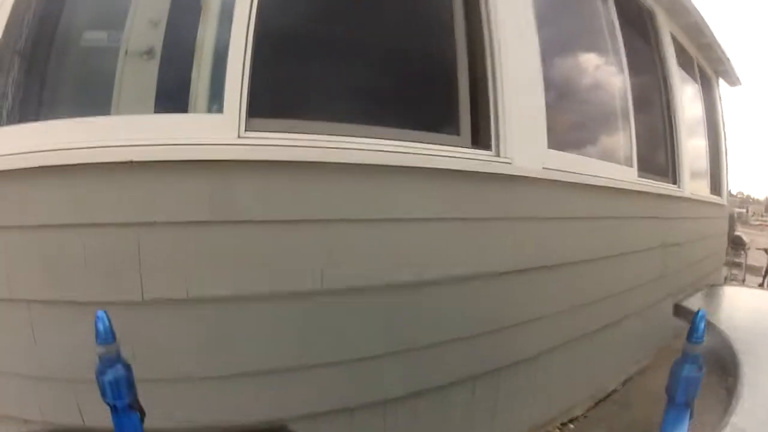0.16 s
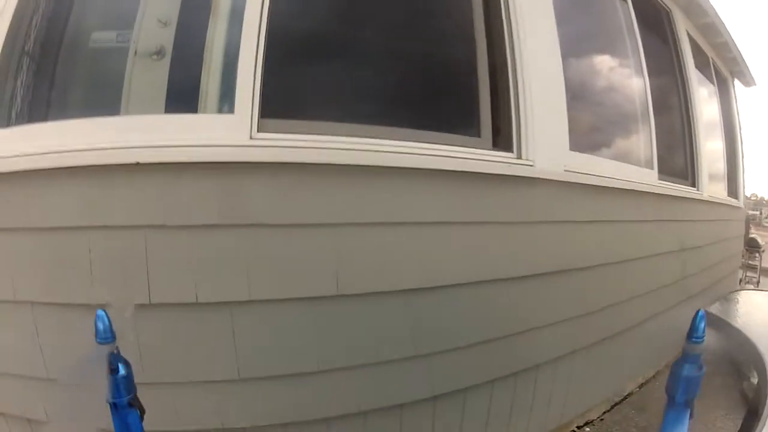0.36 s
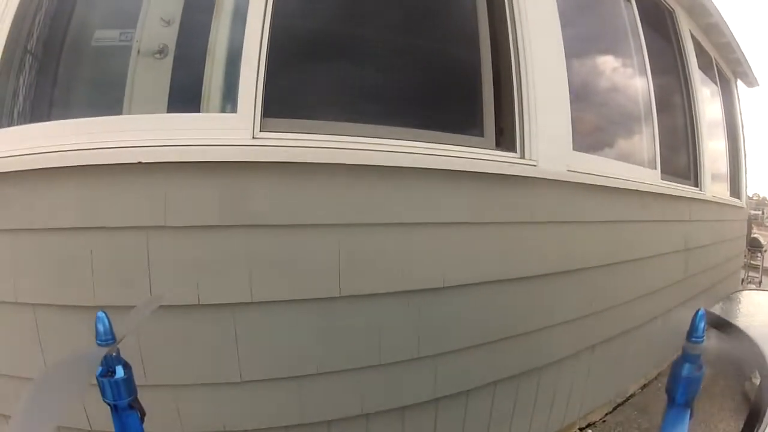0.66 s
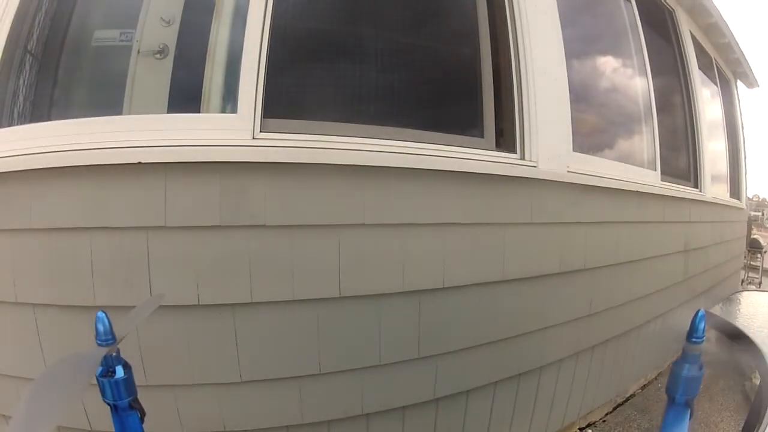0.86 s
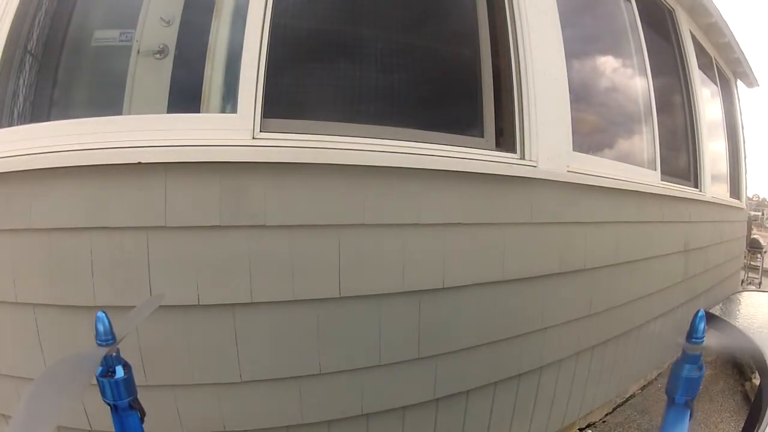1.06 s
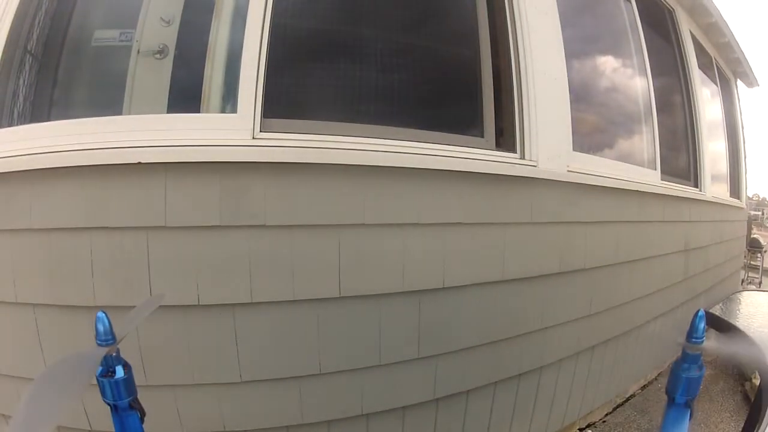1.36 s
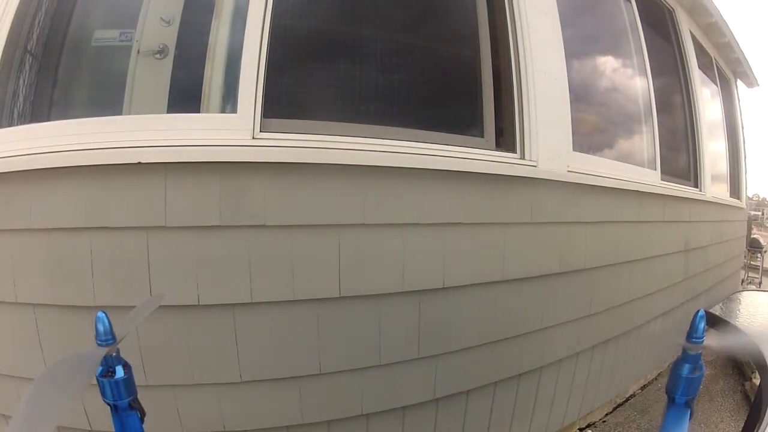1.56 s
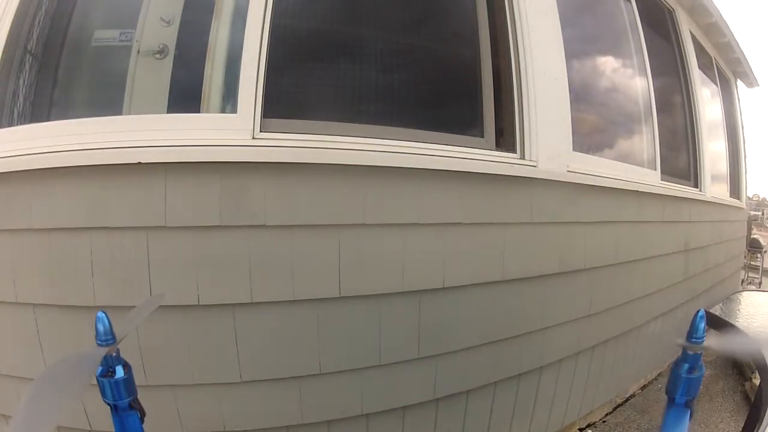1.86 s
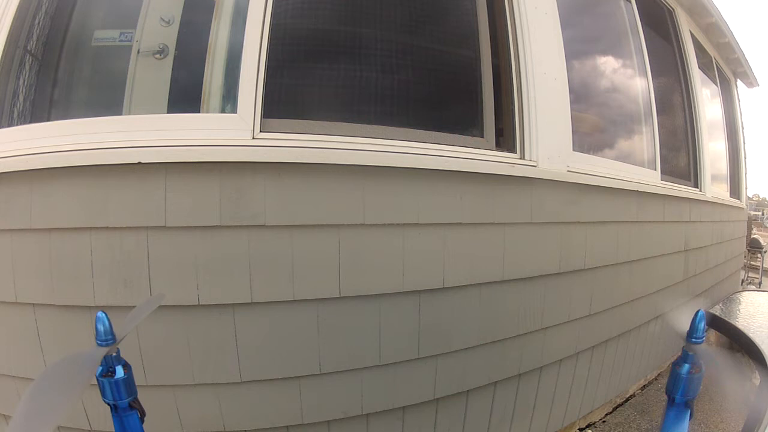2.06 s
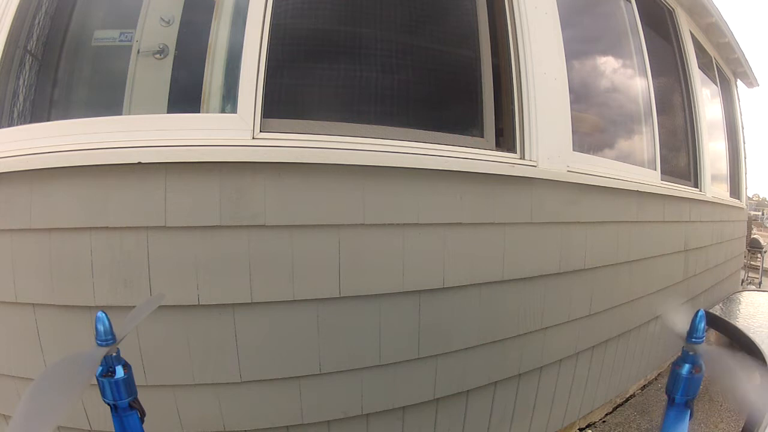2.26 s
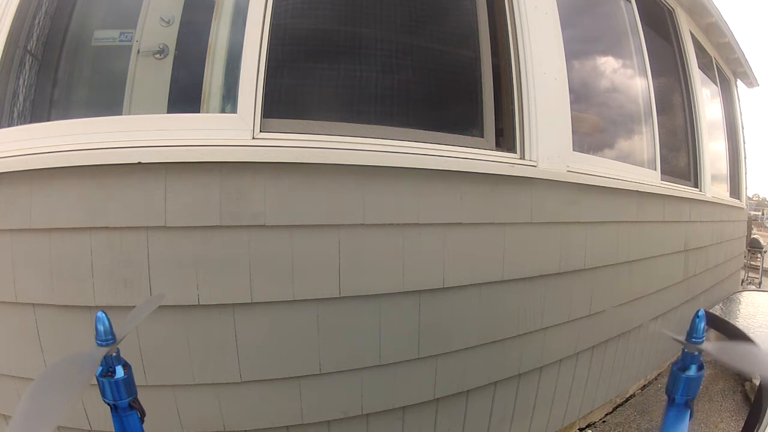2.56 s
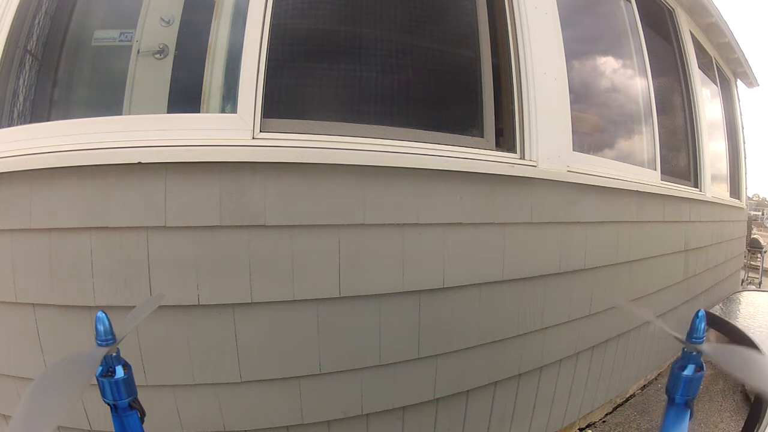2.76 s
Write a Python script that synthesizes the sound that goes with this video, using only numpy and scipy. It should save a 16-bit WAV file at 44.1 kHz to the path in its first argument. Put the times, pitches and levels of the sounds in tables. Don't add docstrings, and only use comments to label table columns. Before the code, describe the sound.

Slowed-down drone crash, captured by a microphone on the frame: a loud cluster of knocks and a thud, rapid uneven blade ticks, low rocking, sliding motor whine, fading to sparse faint clicks and near silence.

```python
import sys
import numpy as np
from scipy import signal
from scipy.fft import rfft, irfft, next_fast_len
from scipy.io import wavfile
from scipy.ndimage import map_coordinates

SR = 44100
rng = np.random.default_rng(int(sys.argv[2]) if len(sys.argv) > 2 else 0)


def gain_from_db(level_db):
    decades = np.asarray(level_db, float) / 20
    return 10 ** decades


def unload_wav(signal):
    wavfile.write(
        sys.argv[1],
        SR,
        np.round(np.clip(np.atleast_2d(signal).T, -1, 1) * 32767).astype(np.int16),
    )


N = 127890


def unit(x):
    return x / np.sqrt(np.mean(x ** 2) + 1e-20)


def along(points, hz):
    f, db = np.transpose(points)
    return gain_from_db(np.interp(np.log(hz + 1), np.log(f + 1), db))


def curves(rows):
    s, *columns = np.transpose(rows)
    return [np.interp(np.arange(N) / SR, s, column) for column in columns]


def wobble(rate):
    knots = rng.standard_normal(int(N * rate / SR) + 4)
    return map_coordinates(knots, [np.arange(N) * rate / SR])


def filtered(x, response):
    m = next_fast_len(N + SR // 2)
    return irfft(rfft(x, m) * response(np.fft.rfftfreq(m, 1 / SR)), m)[..., :N]


def body(peaks):
    def response(f):
        total = 0
        for k, (centre, width, db) in enumerate(peaks):
            damping = 1j * f * width
            total = total + (-1) ** k * gain_from_db(db) * damping / (centre ** 2 - f ** 2 + damping + 1e-9)
        return total
    return response


def case(f):
    case_hz = 2820
    return 1 / (1 + 1j * f / case_hz - (f / case_hz) ** 2) ** 2


def turns():
    cog_hz = [608, 530]
    jolts = [.07, .05]
    coast, ease, jolt_s = 1.0, 0.04, 0.6
    t = np.arange(N) / SR
    slowing = np.exp(-coast * t + ease * t * t)
    return [np.cumsum(hz * slowing * (1 + jolt * np.exp(-t / jolt_s))) / SR for hz, jolt in zip(cog_hz, jolts)]


def ticks():
    # (time [s], peak level [dB], ring [Hz])
    crash_blows = [
        (.001, -7.5, 2400),
        (.0085, -5, 3700),
        (.012, -13, 1700),
        (.0185, -10, 2100),
        (.022, -4.5, 1875),
        (.028, -2.5, 1880),
        (.048, -18.5, 1900),
    ]
    # (time [s], peak level [dB], ring [Hz])
    fast_ticks = [(0.0654, -26, 1740), (0.0722, -23.5, 1800), (0.0774, -13, 1250), (0.1042, -27, 2280),
                  (0.1396, -21.5, 1780), (0.173, -12, 1790), (0.1959, -17, 1850), (0.2074, -21.5, 1940),
                  (0.2294, -30, 1820), (0.2723, -13.5, 1830), (0.2944, -21, 1673), (0.3187, -15.5, 1170),
                  (0.3331, -13.5, 1830), (0.3611, -10.5, 1260), (0.382, -14.5, 1800), (0.4299, -22, 1900),
                  (0.4484, -20, 1794), (0.4893, -16.5, 1780), (0.5124, -25, 2240), (0.5297, -20.5, 1190),
                  (0.5482, -20.5, 1146), (0.5766, -20.5, 1193), (0.598, -15.5, 1660), (0.629, -21, 1220),
                  (0.6489, -31, 1740), (0.6744, -28, 1770), (0.6964, -35, 1810), (0.7357, -27, 1754),
                  (0.7544, -37, 1740), (0.7901, -30.5, 1800), (0.8066, -31, 1636), (0.8225, -26, 1773),
                  (0.8619, -29, 1722), (0.8964, -34.5, 1585), (0.9148, -27, 1220), (0.9264, -31, 2400),
                  (0.9482, -45, 1210), (0.9667, -34, 1253), (0.9802, -29, 1820), (1.0186, -41, 1750),
                  (1.0444, -38, 1336), (1.1014, -42.5, 2270)]
    # (time [s], peak level [dB], ring [Hz])
    slow_ticks = [(1.1258, -28, 2366), (1.1628, -32.5, 1170), (1.1957, -32, 2350), (1.2331, -39, 1348),
                  (1.3763, -39.5, 2140), (1.5015, -40, 2260), (1.5908, -33.5, 1485), (1.6886, -32.5, 1750),
                  (1.8008, -38.5, 1717), (1.8652, -55, 2300), (1.931, -38, 1780), (1.992, -39, 2200),
                  (2.005, -51, 2330), (2.0702, -37, 1770), (2.2463, -45.5, 1790), (2.3506, -55.5, 2440),
                  (2.5701, -56, 1241)]
    # (frequency [Hz], width [Hz], level [dB])
    blade_modes = [(1016, 340, -7), (1500, 94, -7.5), (1790, 130, -3.5), (2440, 370, -7.5),
                   (2810, 200, -14.5), (3700, 280, -9)]
    scrape_s, grows_per_s = 0.0039, 0.42
    ring_width_hz, ring_db = 360, 2.5
    case_leak, level_db = 0.13, -0.5

    rows = list(crash_blows) + list(fast_ticks) + list(slow_ticks)
    t = np.arange(SR // 10) / SR
    f = np.fft.rfftfreq(len(t), 1 / SR)
    blade = body(blade_modes)(f) * (case(f) + case_leak)
    out = np.zeros(N + SR)
    for s, db, hz in rows:
        length = scrape_s * np.exp(grows_per_s * s)
        shape = ((t / length) * np.exp(1 - t / length)) ** 4
        contact = shape * rng.standard_normal(len(t))
        own_mode = body([(hz, ring_width_hz, ring_db / 2)])(f) ** 2 * case(f / 2)
        ring = irfft(rfft(contact) * (blade + own_mode), len(t))
        start = max(round((s - 0.9 * length) * SR), 0)
        out[start:][:len(t)] += gain_from_db(db + level_db) * ring / np.abs(ring).max()
    return out[:N]


def rocking():
    # (time [s], level [dB])
    low_rocking = [(0.0, -17), (0.05, -36.5), (0.07, -20.5), (0.2, -25), (0.23, -33), (0.27, -19.5),
                   (0.3, -24.5), (0.4, -15.5), (0.48, -22.5), (0.51, -40), (0.54, -32.5), (0.86, -34.5),
                   (0.92, -44.5), (1.04, -34.5), (1.16, -66.5), (1.19, -47.5), (1.31, -45.5), (2.05, -57)]
    # (time [s], pitch [Hz], level [dB])
    upper_rocking = [(0, 129.7, -21.5), (.04, 99.1, -25), (.075, 98.7, -15), (.13, 100.3, -27),
                     (.16, 94.6, -17.5), (.19, 97, -25.5), (.23, 107.1, -16), (.27, 106.2, -23),
                     (.31, 105.7, -15.5), (.35, 100.9, -20.5), (.42, 111.4, -16), (.48, 104.9, -23.5),
                     (.59, 107.3, -28.5), (.72, 113, -39), (.93, 114.2, -37), (1.06, 104.1, -45.5),
                     (1.1, 104.9, -61), (1.42, 119, -53.5)]
    # (middle [s], half length [s], pitch [Hz], level [dB])
    late_swells = [(1.53, 0.042, 118, -43), (1.599, 0.03, 122, -39.5), (1.725, 0.027, 122, -38),
                   (1.81, 0.064, 108, -40.5), (1.892, 0.035, 112, -39), (1.949, 0.053, 127, -39),
                   (2.061, 0.073, 113.2, -44), (2.133, 0.057, 75, -43.5), (2.177, 0.039, 115.3, -51),
                   (2.271, 0.047, 71.4, -37), (2.364, 0.07, 70.35, -45.5), (2.365, .05, 125, -47.5),
                   (2.48, .03, 105, -46.5), (2.57, 0.041, 122, -38.5), (2.698, .06, 105.8, -46.5),
                   (2.85, .04, 72, -41.5)]
    low_hz, rest_db_per_s = 74.8, 4.5
    thud_db, thud_hz, thud_t60_s = -6.5, 162, 0.14

    t = np.arange(N) / SR
    low_db, = curves(low_rocking)
    up_hz, up_db = curves(upper_rocking)
    low_cycles = np.cumsum(low_hz + 4.0 * wobble(8.2)) / SR
    low = gain_from_db(low_db + 2.0 * wobble(12)) * np.sin(2 * np.pi * low_cycles)
    up_cycles = np.cumsum(up_hz + 6 * wobble(30)) / SR
    up = gain_from_db(up_db + 0.91 * wobble(25)) * np.sin(2 * np.pi * up_cycles)
    rest = gain_from_db(-rest_db_per_s * np.clip(t - upper_rocking[-1][0], 0, None))
    late = np.zeros(N)
    for s, half, hz, db in late_swells:
        late += gain_from_db(db) * np.exp(-((t - s) / half) ** 2) * np.sin(2 * np.pi * hz * t)
    thud = gain_from_db(thud_db - 60 * t / thud_t60_s) * np.cos(2 * np.pi * thud_hz * t)
    return np.sqrt(2) * (low + rest * up + late) + thud


def shaking():
    # (time [s], level [dB])
    shake_strength = [(0.0, -28.5), (0.16, -30.5), (0.44, -29.5), (0.6, -37.5), (0.8, -39), (0.94, -43.5),
                      (1.53, -55), (1.68, -58.5), (2.02, -57.5), (2.54, -69), (2.9, -75.5)]
    # (frequency [Hz], width [Hz], level [dB])
    frame_modes = [(286.8, 30, -4.5), (913, 73, -2), (1250, 120, -7.5), (1717, 91, -4.5), (2300, 140, -7),
                   (2990, 150, -17.5), (3610, 97, -9.5), (4930, 200, -25.5)]
    # (frequency [Hz], level [dB per Hz])
    rumble_spectrum = [(40, -17), (70, -11), (110, 3.5), (170, -2), (230, -6.5), (320, -8.5), (450, -35),
                       (800, -58.5)]
    poles = 14
    rumble_db, rumble_grows = 6, 0.74
    sway_db, sway_fall_db_per_s, sway_hz = -20, 24, 44
    sway_rest_db = -63.5

    strength_db, = curves(shake_strength)
    beat_db = sum(1.1 * np.cos(2 * np.pi * done / poles) for done in turns())
    beat_db = beat_db + 3.54 * wobble(260) + wobble(60) + wobble(13)
    grains = gain_from_db(beat_db) * rng.standard_normal(N)
    rattle = unit(filtered(grains, lambda f: body(frame_modes)(f) * (case(f) + 0.42)))

    lumps = gain_from_db(2.2 * wobble(15)) * rng.standard_normal(N)
    rumble = unit(filtered(lumps, lambda f: along(rumble_spectrum, f)))
    mean_db = strength_db.mean()
    rumble_level = gain_from_db(mean_db + rumble_db + rumble_grows * (strength_db - mean_db))

    def heave(f):
        return (f / 30) ** 2 / (1 + (f / 30) ** 2) / (1 + (f / sway_hz) ** 4)

    sway = unit(filtered(rng.standard_normal(N), heave))
    sway_level = gain_from_db(sway_db - sway_fall_db_per_s * np.arange(N) / SR) + gain_from_db(sway_rest_db)
    return gain_from_db(strength_db) * rattle + rumble_level * rumble + sway_level * sway


def noise_floor():
    # (frequency [Hz], level [dB per Hz])
    floor_spectrum = [(88, -31), (150, 1.5), (475, -9), (571, -19), (666, -14.5), (708, -14.5), (1440, -23),
                      (3090, -22), (5900, -28), (7670, -55), (13000, -120)]
    hiss = filtered(rng.standard_normal(N), lambda f: along(floor_spectrum, f) * (f > 140))
    return gain_from_db(-63) * unit(hiss)


def motors():
    first_orders = (1, 2, 5, 6, 7, 8, 9, 11, 12)
    second_orders = (3, 4, 5, 8, 12)
    order_levels = [
        [6, 4, -1, 2, -3, -4.5, -7.5, -3, -9],
        [4, 4, -3, -9.5, -4.5],
    ]
    # (frequency [Hz], width [Hz], level [dB])
    arm_modes = [(230, 64, -6), (305, 44, -3), (459, 50, -16), (665.4, 36, -11), (820.8, 70, -3),
                 (920, 120, 1), (1220, 260, -8), (1590, 320, -12.5)]
    whine_db, fall_db_per_s, start_s, roughness = -27, 11, 0.12, 0.5
    flutter_db = 3.2
    notch_hz, notch_width_hz, notch_db = 561, 143, -8.5

    t = np.arange(N) / SR
    whine = np.zeros(N)
    for done, orders, levels in zip(turns(), (first_orders, second_orders), order_levels):
        for k, db in zip(orders, levels):
            level = gain_from_db(db + flutter_db * wobble(25) + 2.5 * wobble(70))
            whine += level * np.sin(2 * np.pi * k * done + roughness * 3 * wobble(30))
    fade = gain_from_db(whine_db - fall_db_per_s * t - 1.0 * t * t) * (1 - np.exp(-t / start_s))

    def arms(f):
        notch = gain_from_db(notch_db * np.exp(-((f - notch_hz) / notch_width_hz) ** 2))
        low_cut = (f / 200) ** 2 / (1 + (f / 200) ** 2)
        return body(arm_modes)(f) * notch * low_cut / (1 + (f / 1500) ** 4)

    return filtered(fade * whine, arms)


def snaps():
    # (time [s], peak level [dB])
    plastic_snaps = [(0.0283, -22.5), (0.0662, -27.5), (0.1036, -35), (0.1765, -27), (0.2084, -50.5),
                     (0.2219, -40), (0.2784, -30.5), (0.2937, -46), (0.3158, -41), (0.3302, -43.5),
                     (0.384, -33.5), (0.4429, -39), (0.4952, -41.5), (0.513, -49), (0.5511, -36),
                     (0.601, -44), (0.6673, -56), (0.7103, -65), (0.8016, -61), (0.8574, -67),
                     (0.9075, -59.5), (0.9408, -65), (0.9615, -54), (0.9947, -59), (0.7343, -72),
                     (0.7772, -63), (0.688, -60), (0.617, -57), (0.577, -50), (1.1453, -68), (1.0171, -49),
                     (1.0713, -65.5), (2.2002, -55)]
    level_db, t60_s, low_hz = 8.5, 0.011, 2612
    out = np.zeros(N + SR)
    t = np.arange(SR // 50) / SR
    for s, db in plastic_snaps:
        crack = gain_from_db(db + level_db - 60 * t / t60_s) * rng.standard_normal(len(t))
        out[round(s * SR):][:len(t)] += crack
    return filtered(out[:N], lambda f: (1j * f / low_hz / (1 + 1j * f / low_hz)) ** 2)


def thumps():
    # (time [s], peak level [dB])
    frame_drops = [(0.139, -24.5), (0.198, -18.5), (0.331, -18.5), (0.439, -25), (0.523, -28.5),
                   (0.573, -22.5), (0.599, -27.5), (0.622, -24.5), (0.649, -29.5), (0.673, -35),
                   (0.734, -36), (1.129, -36)]
    thump_hz, width_hz, level_db = 200, 150, -5
    blows = np.zeros(N)
    for s, db in frame_drops:
        blows[round(s * SR)] = gain_from_db(db + level_db) * SR / width_hz
    return filtered(blows, lambda f: body([(thump_hz, width_hz, 0)])(f) ** 2)


def squeak():
    # (time [s], pitch [Hz], level [dB])
    first_squeak = [(.43, 3760, -92.5), (.445, 3720, -51.5), (.47, 3620, -56), (.49, 3500, -58.5),
                    (.5, 3480, -94)]
    # (time [s], pitch [Hz], level [dB])
    second_squeak = [(.63, 3860, -75), (.65, 3885, -62), (.68, 3760, -60), (.72, 3700, -52),
                     (.76, 3583, -52), (.783, 3430, -60), (.789, 3190, -51), (.797, 3186, -57),
                     (.806, 3090, -96.5)]
    out = np.zeros(N)
    for hz, db in (curves(first_squeak), curves(second_squeak)):
        cycles = np.cumsum(hz + 12 * wobble(90)) / SR
        out += np.sqrt(2) * gain_from_db(db + 0.88 * wobble(120)) * np.sin(2 * np.pi * cycles)
    return out


def scrape():
    # (frequency [Hz], width [Hz], level [dB])
    scrape_modes = [(2350, 150, -4), (2880, 180, 0), (3500, 300, -9), (4400, 700, -18)]
    middle_s, length_s, level_db = 2.206, 0.011, -56
    swell = np.exp(-((np.arange(N) / SR - middle_s) / length_s) ** 2)
    hiss = unit(filtered(rng.standard_normal(N), lambda f: body(scrape_modes)(f) * (f < 6000)))
    return gain_from_db(level_db) * swell * hiss


def scene():
    crash = ticks() + rocking() + shaking() + noise_floor()
    aftermath = motors() + snaps() + thumps() + squeak() + scrape()
    return (crash + aftermath)[None]


def band_limit(x):
    return signal.sosfilt(signal.butter(12, 15620, fs=SR, output="sos"), x)


def record(dry):
    duck_s, duck_db, duck_back_s = 0.031, -5.5, 0.027
    hold_hz, repeats, top_hz = 12000, 4, 15640
    t = np.arange(N) / SR
    after = t - duck_s
    gain = gain_from_db(duck_db * np.clip(after * 1000, 0, 1) * np.exp(-np.abs(after) / duck_back_s))
    slow = filtered(gain * dry, lambda f: np.clip((hold_hz / 2 - f) / 250, 0, 1) * (f > 12))
    combed = slow * (1 + 2 * np.cos(2 * np.pi * hold_hz * t))

    def hold(f):
        return np.sinc(f / hold_hz) / np.sinc(f / hold_hz / repeats) * (f < top_hz)

    held = filtered(combed, hold)
    return band_limit(np.clip(held, -1, 1))


dry = scene()
out = record(dry)
unload_wav(out)
```